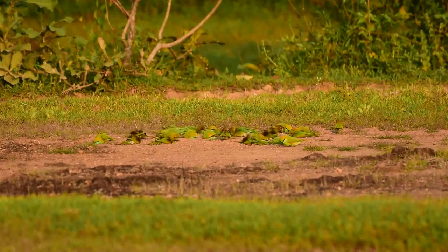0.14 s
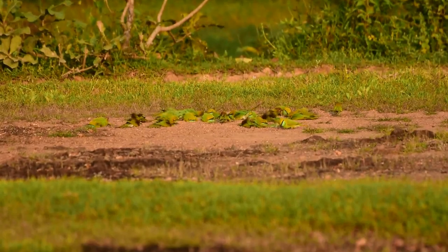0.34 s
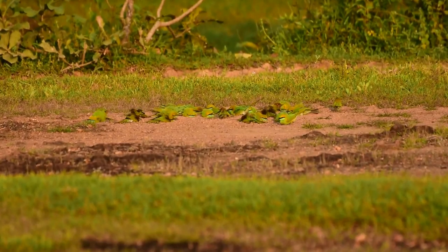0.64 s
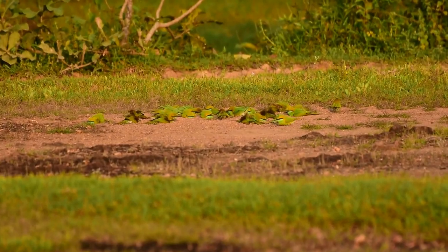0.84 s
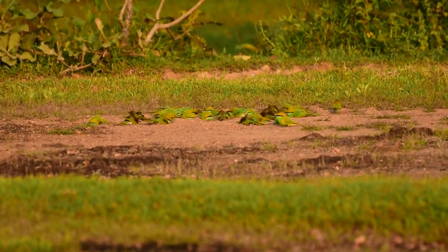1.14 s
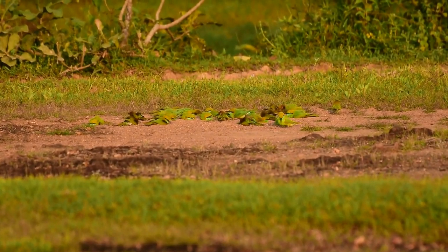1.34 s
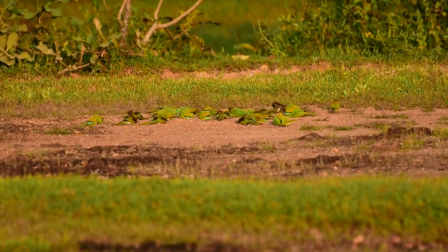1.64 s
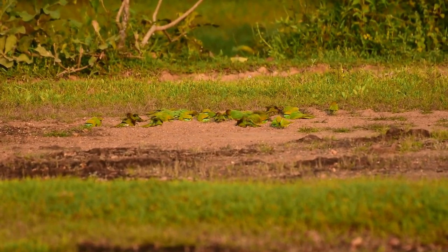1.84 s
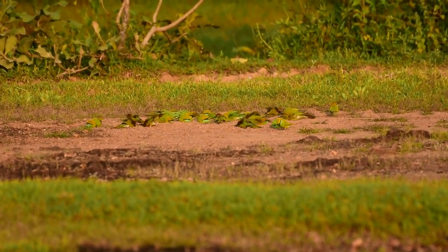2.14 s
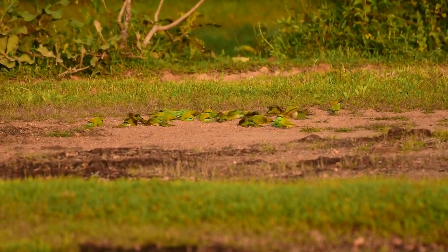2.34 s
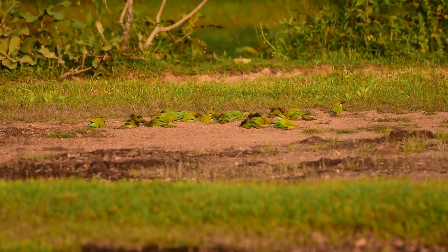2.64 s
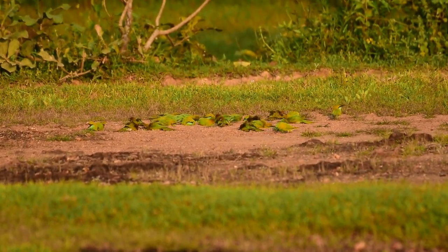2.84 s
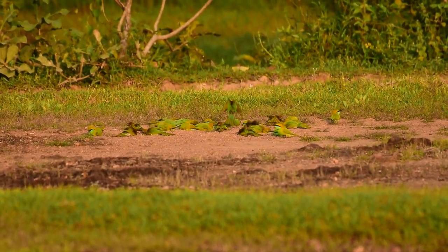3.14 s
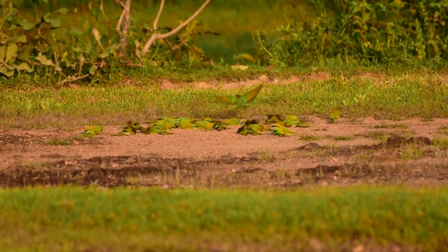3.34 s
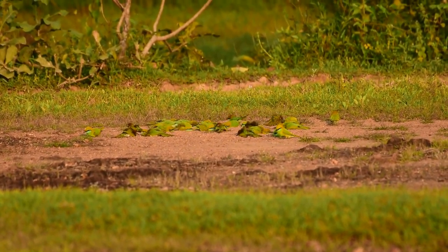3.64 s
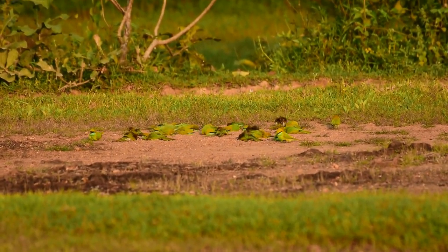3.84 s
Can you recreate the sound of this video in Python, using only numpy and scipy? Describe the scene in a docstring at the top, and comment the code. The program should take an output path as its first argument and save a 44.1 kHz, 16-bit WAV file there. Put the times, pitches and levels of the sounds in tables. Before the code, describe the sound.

Repeated bird calls and scattered distant whistles over faint crickets and soft outdoor hiss.

```python
"""Open ground by scrub, from a camera's stereo microphone as it fades in. Nearest, a barbet-like bird
repeats one long and three short falling notes; farther off, other birds whistle short slurs, and the
bushes echo them all. Distant crickets, katydids and a low drone hang over the air noise. A twig-like
snap and a rattle come early on the right, faint ticks later, and the camera itself whines very high."""
import sys
import numpy as np
from scipy import signal
from scipy.fft import rfft, irfft, next_fast_len
from scipy.io import wavfile
from scipy.ndimage import uniform_filter1d, map_coordinates

SR = 44100
rng = np.random.default_rng(int(sys.argv[2]) if len(sys.argv) > 2 else 0)


def file_out(sig):
    """Save sig as 16-bit WAV at sys.argv[1]."""
    # one column per channel
    cols = np.atleast_2d(sig).T
    # limit, then scale
    lim = np.clip(cols, -1, 1)
    pcm = np.round(lim * 32767).astype(np.int16)
    wavfile.write(sys.argv[1], SR, pcm)


N = 176400


def amp(db):
    return 10 ** (np.asarray(db) / 20)


def unit_rms(x):
    return x / np.sqrt(np.mean(x ** 2) + 1e-20)


def curve_at(points, hz):
    """Interpolate (f/Hz, value) points on a log frequency axis."""
    knot_hz, values = np.transpose(points)
    return np.interp(np.log(hz + 1), np.log(knot_hz + 1), values)


def wobble(rate, size=N):
    """A smooth random curve, rate knots a second."""
    return map_coordinates(rng.standard_normal(size // 20), [np.arange(size) * rate / SR])


def filtered(x, response):
    """Filter x by response, a function of frequency in Hz."""
    size = next_fast_len(x.shape[-1] + 8192)
    hz = np.fft.rfftfreq(size, 1 / SR)
    return irfft(rfft(x, size) * response(hz), size)[..., :x.shape[-1]]


def pan(x, left_db, left_lag_s=0):
    """Place a source at the microphone: the left channel is left_db louder and left_lag_s later."""
    half = np.array([[.5], [-.5]])
    return filtered(x, lambda hz: amp(left_db * half) * np.exp(-2j * np.pi * hz * left_lag_s * half))


def add(out, start_s, x):
    """Mix x into out from start_s on."""
    part = out[max(round(start_s * SR), 0):][:len(x)]
    part += x[:len(part)]


def stereo_noise(response, likeness, patchy_db=0):
    """Noise of rms 1 with a left-right likeness by frequency; patchy_db mottles it in time and pitch."""
    def mid_side(hz):
        angle = np.arccos(np.clip(curve_at(likeness, hz), -1, 1)) / 2
        return response(hz) * np.array([np.cos(angle), np.sin(angle)])

    spectra = signal.stft(rng.standard_normal((2, N)), nperseg=512)[2]
    patches = uniform_filter1d(rng.standard_normal(spectra.shape[1:]), size=6, axis=0)
    patches = unit_rms(uniform_filter1d(patches, size=10, axis=1))
    pair = signal.istft(spectra * amp(patchy_db * patches), nperseg=512)[1][:, :N]
    mid, side = filtered(pair, mid_side)
    return unit_rms(np.array([mid + side, mid - side]))


def air():
    """Broad air noise over open ground, gently wavering, centred in the bass and wide in the treble."""
    # air spectrum: f/Hz, relative density/dB
    spectrum = [(20, -44), (50, -11.5), (90, -1.5), (250, -1), (600, -1.5), (1600, -1.5), (2400, -5.5),
                (3300, -2.5), (4200, -6), (5500, -9), (7200, -11), (8900, -16.5), (10000, -11.5),
                (11300, -22.5), (15500, -29.5)]
    # stereo image: f/Hz, left-right likeness/0-1
    likeness = [(30, .75), (80, 0.99), (200, 0.91), (700, 0.5), (1400, 0.73), (2500, 0.48), (8000, 0.18),
                (15000, .2)]
    level = amp(-54.5 + 1.4 * wobble(3.1))
    return level * stereo_noise(lambda hz: amp(curve_at(spectrum, hz)), likeness, patchy_db=1.5)


def crickets_and_drone():
    """Many far insects on one pitch blur into a narrow, unevenly pulsing band; the lowest is the drone."""
    # bands: f/Hz, width/Hz, level/dB, pulsing rate/Hz, pulse depth/dB, left-right likeness/0-1
    bands = [(3720, 250, -58, 90, 3.5, 0.97), (431.8, 107, -65.5, 30, 2.5, 1),
             (2241, 12.7, -69, 4.4, 1.5, 0.83), (4890, 80, -70, 12, 3, 0.18),
             (2909, 59, -68.5, 8.1, 5.5, 0.44)]
    out = 0
    for hz, width, db, rate, depth_db, likeness in bands:
        level = amp(db + depth_db * np.tanh(2 * wobble(rate)))
        band = stereo_noise(lambda f: 1 / (1 + ((f - hz) / width * 2) ** 4), [(hz, likeness)])
        out += level * band
    return out


def katydids():
    """Chirps of a few wing strokes; the singers start quick, fall into step, then drift apart and blur."""
    # three singers on neighbouring pitches: f/Hz, width/Hz, settled chirp rate/Hz, beat offset t/s
    singers = [(7750, 80, 7.5, .165), (7975, 45, 7.33, .131), (8190, 95, 7.27, .115)]
    stroke_hz, blur_at_s = 27, 2.7
    t = np.arange(N) / SR
    chirp_depth = .62 * (1 - .6 / (1 + np.exp((blur_at_s - t) / .13)))
    lag_rad = 9 * np.exp(-t / .35)  # catching up hurries the first chirps
    out = 0
    for hz, width, rate, offset_s in singers:
        chirps = 1 + chirp_depth * np.cos(2 * np.pi * rate * (t - offset_s) - lag_rad)
        strokes = 1 + .18 * np.cos(2 * np.pi * stroke_hz * t + wobble(2))
        band = stereo_noise(lambda f: np.exp(-((f - hz) / width) ** 2), likeness=[(hz, .7)])
        out += amp(-69 + .81 * wobble(4.88)) * chirps * strokes * band
    return out


def camera_whine():
    """The camera's own faint, wavering tone, stronger on the left of the microphone."""
    whine_hz = 15689
    t = np.arange(N) / SR
    level = amp(-77.5 + wobble(7.9))
    return pan(np.sqrt(2) * level * np.sin(2 * np.pi * whine_hz * t), left_db=9.5)


def whistle(length_s, start_hz, mid_hz, end_hz, rough, taper, swell_db=0, skew=1):
    """A bird's note: a sine and faint octave on a curved glide; rough adds a burr in pitch and level."""
    burr_hz = 175
    progress = np.linspace(0, 1, round(length_s * SR))
    bend = progress ** skew  # skew under 1 reaches mid_hz early
    glide_hz = (start_hz * (1 - bend) * (1 - 2 * bend) + 4 * mid_hz * bend * (1 - bend)
                + end_hz * bend * (2 * bend - 1))
    flutter, drift = (wobble(rate, size=SR // 2)[:len(progress)] for rate in (400, 60))
    burr = np.sin(2 * np.pi * burr_hz * length_s * progress + drift)
    hz = glide_hz + rough * (240 * flutter + 350 * burr)
    arch = np.abs(np.sin(np.pi * progress)) ** taper
    level = arch * amp(swell_db * progress + rough * 11 * burr)
    phase = 2 * np.pi * np.cumsum(hz) / SR
    return np.sqrt(2) * level * (np.sin(phase) + amp(-31) * np.sin(2 * phase))


def barbet():
    """The nearest bird: one swelling long note that tops out early, then three short falling ones."""
    # phrases: long note t/s, first short note t/s, spacing/s, base level/dB
    phrases = [(0.085, 0.25, 0.046, -44.5), (0.977, 1.137, 0.046, -44), (1.861, 2.02, 0.049, -45),
               (2.759, 2.916, .047, -44.5), (3.696, 3.855, 0.051, -45)]
    # short notes: delay after the first/spacings, level over the base/dB
    short_notes = [(0, 4), (0.999, 5), (2.101, 2)]
    out = np.zeros(N)
    for long_s, short_s, spacing_s, db in phrases:
        long_note = whistle(.09, 1080, 1300, 1091, rough=.013, taper=.8, swell_db=10.5, skew=.846)
        add(out, long_s, amp(db) * long_note)
        for steps, lift_db in short_notes:
            short_note = whistle(.0343, 1330, 1240, 1107, rough=.015, taper=.8)
            add(out, short_s + spacing_s * steps, amp(db + lift_db) * short_note)
    return out


def scrub_echo(birds):
    """Scattered echoes from bushes and ground, mostly from ahead."""
    # echo decay: f/Hz, time to fall 60 dB/s
    decay = [(1200, 0.81), (2500, 1), (6000, 0.95)]
    flutter_db, side_power, delay_samples = 7.5, .05, 500
    hz, t, spectra = signal.stft(rng.standard_normal((2, SR // 2)), SR, nperseg=256)
    fall = amp(-60 * t / curve_at(decay, hz)[:, None])
    mid, side = signal.istft(spectra * fall, SR, nperseg=256)[1]
    side *= np.sqrt(side_power)
    tail = np.array([mid + side, mid - side]) / np.linalg.norm(mid)
    # a fast random flutter in level blurs the echoes so they do not ring
    fluttered = birds * amp(flutter_db * np.tanh(wobble(250)))
    delayed = np.pad(fluttered, (delay_samples, 0))
    return signal.fftconvolve(delayed[None], tail, axes=1)[:, :N]


def far_birds():
    """Other birds, farther off, whistle scattered short slurs, each at least a little rough."""
    # slurs: t/s, length/s, start f/Hz, middle f/Hz, end f/Hz, level/dB, added roughness/0-1
    slurs = [ (0.322, 0.032, 2890, 3320, 3540, -52.5, 0.04), (0.583, 0.033, 2520, 2330, 2300, -51, 0.03),
             (0.597, .185, 3880, 4560, 4400, -61, 0.09), (0.656, 0.011, 2060, 2450, 2930, -52, 0.3),
             (0.675, 0.051, 2640, 2404, 2430, -50, 0.12), (0.649, 0.15, 1340, 1424, 1390, -56.5, 0.2),
             (1.02, 0.27, 2053, 2090, 2134, -65.5, 0.06), (1.319, 0.16, 1412, 1454, 1382, -57, 0.18),
             (1.169, 0.098, 3100, 3206, 2950, -61, 1), (1.374, 0.03, 3560, 3730, 3840, -43, 0.04),
             (1.404, 0.017, 3200, 2740, 2650, -50, 0.35), (1.44, 0.036, 3140, 3290, 3100, -43.5, 0),
             (1.479, 0.023, 2800, 2664, 2720, -46, 0.35), (1.496, .024, 2820, 2650, 2580, -39, 0.06),
             (1.685, 0.036, 3820, 3570, 3700, -50, 0.25), (1.712, 0.024, 3900, 4170, 4000, -56, 0.4),
             (1.963, 0.0079, 2750, 3070, 3250, -45, 0.1), (1.972, 0.037, 3574, 4034, 3940, -39.5, 0),
             (2.01, 0.0096, 3150, 3120, 3100, -45.5, 0.03), (2.022, 0.017, 2800, 3140, 3320, -48.5, 0.14),
             (2.075, 0.0085, 3220, 3050, 2860, -40, 0.1), (2.083, 0.026, 2780, 2920, 2880, -40.5, 0.13),
             (2.102, 0.019, 2790, 2680, 2590, -44.5, 0.2), (2.275, 0.044, 2250, 1813, 1870, -56, 0.2),
             (2.06, 0.196, 3516, 3470, 3450, -58.5, 0.66), (2.499, 0.061, 2730, 2890, 2700, -56, 0.24),
             (2.542, 0.029, 2600, 2500, 2390, -51.5, 0.26), (2.605, 0.035, 3142, 3086, 3090, -38.5, 0.09),
             (2.698, 0.059, 3217, 3765, 4336, -44.5, 0.13), (2.743, 0.024, 4020, 4060, 3750, -43.5, 0.24),
             (2.794, 0.016, 1360, 2050, 2430, -48, 0.17), (2.81, 0.058, 2475, 2533, 2810, -44.5, 0.03),
             (2.867, 0.037, 2550, 2560, 2720, -47.5, 0.02), (2.908, 0.022, 2240, 2130, 2130, -44.5, 0.06),
             (2.929, 0.028, 1710, 1780, 2150, -45.5, 0.06), (2.937, 0.074, 2078, 2145, 1696, -44.5, 0),
             (3.006, .045, 1700, 1657, 1770, -48, 0.02), (3.326, 0.026, 3430, 3734, 3730, -41, 0),
             (3.352, 0.015, 3270, 2700, 2400, -51, 0.57), (3.388, 0.035, 3160, 3330, 3060, -43, 0),
             (3.425, 0.015, 2740, 2680, 2750, -43.5, 0.47), (3.438, 0.026, 2830, 2695, 2510, -37.5, 0.06),
             (3.572, 0.033, 3350, 3800, 3650, -49, 0.17), (3.644, 0.021, 2260, 2215, 2240, -48.5, 0.07),
             (3.677, 0.0035, 2920, 2510, 2040, -40, 0.03), (3.683, 0.009, 2060, 2660, 3100, -45, 0),
             (3.686, 0.024, 3240, 3186, 3370, -40.5, 0.03), (3.717, 0.034, 3476, 3616, 3390, -44.5, 0.17),
             (3.742, 0.032, 2850, 2610, 2490, -41, 0.35), (3.859, 0.028, 2670, 2560, 2270, -41.5, 0.24),
             (3.883, 0.012, 3160, 3130, 3140, -37.5, 0.05), (3.895, 0.022, 3150, 3247, 3150, -36, 0.04),
             (0.622, 0.048, 334, 333, 332, -56, 0), (2.151, 0.13, 1496, 1556, 1430, -59, 0.14)]
    out = np.zeros(N)
    for start_s, length_s, *glide_hz, db, rough in slurs:
        add(out, start_s, amp(db) * whistle(length_s, *glide_hz, rough=.06 + rough, taper=.5))
    return out


def snap_and_ticks():
    """Short bright noise bursts right of centre: a loud twig-like snap, a rattle, then faint ticks."""
    # the snap, the rattle after it and the thin dry ticks: t/s, energy level/dB
    snap = [(0.3737, 4)]
    rattle = [(.448, -27), (.452, -37), (.4755, -22), (.481, -25.5), (.4855, -27), (.4905, -32)]
    ticks = [(1.1785, -37), (1.2315, -36), (1.3275, -41), (2.7995, -40), (3.3885, -37), (3.3945, -38),
             (3.4055, -37)]
    # burst spectra: f/Hz, relative density/dB
    snap_spectrum = [(100, -28), (670, -27), (1500, -21), (2800, -16), (3800, -4), (5000, -3), (6350, -3),
                     (9000, -28), (11600, -17), (15500, -32)]
    tick_spectrum = [(2500, -16), (7500, 0), (15000, -6)]
    mid, side = np.zeros((2, N))
    t = np.arange(-SR // 50, SR // 50) / SR  # each burst peaks at t = 0
    for events, rise_s, t60_s, spectrum in [(snap, .0019, .0076, snap_spectrum),
                                            (rattle, .0004, .008, snap_spectrum),
                                            (ticks, .0004, .008, tick_spectrum)]:
        envelope = np.where(t < 0, np.exp(t / rise_s), amp(-60 * t / t60_s))
        for peak_s, db in events:
            for channel in (mid, side):
                burst = rng.standard_normal(len(t)) * envelope
                burst = filtered(burst, lambda hz: amp(curve_at(spectrum, hz)))
                add(channel, peak_s + t[0], amp(db) * burst / np.linalg.norm(burst))
    return pan(mid, left_db=-5, left_lag_s=35e-6) + .3 * np.array([side, -side])


def scene():
    """All that reaches the microphone, with the birds a little left of centre."""
    near, far = barbet(), far_birds()
    birds = pan(near, left_db=1.5, left_lag_s=-32e-6) + pan(far, left_db=2.4, left_lag_s=-11e-6)
    echo = amp(-13.5) * scrub_echo(far + amp(-1.5) * near)
    background = pan(air() + crickets_and_drone(), left_db=.03)
    return background + katydids() + birds + echo + snap_and_ticks()


def record(dry):
    """The camera adds its whine, fades in from silence and keeps nothing above its band limit."""
    # fade-in: t/s, gain/dB
    fade = [(.03, -27.5), (.1, -30), (.2, -23), (0.301, -12), (.4, -3), (.5, -0.5)]
    silent_s, top_hz = .036, 15800
    t = np.arange(N) / SR
    fade_s, fade_db = np.transpose(fade)
    gain = amp(np.interp(t, fade_s, fade_db)) * (t > silent_s)
    return filtered((dry + camera_whine()) * gain, lambda hz: hz < top_hz)


dry = scene()
out = record(dry)
file_out(out)
```